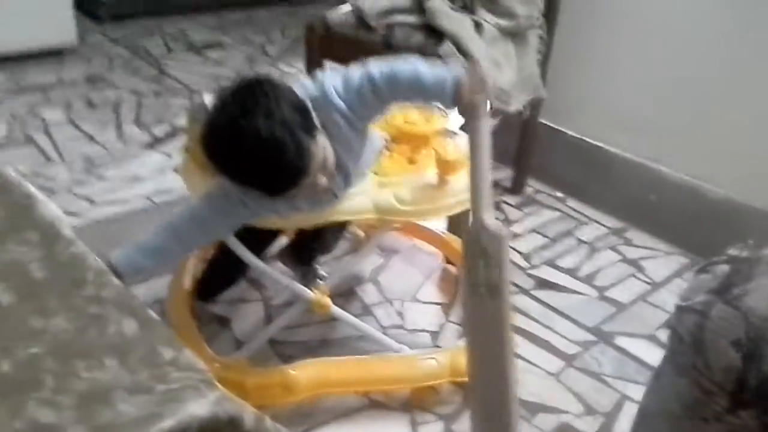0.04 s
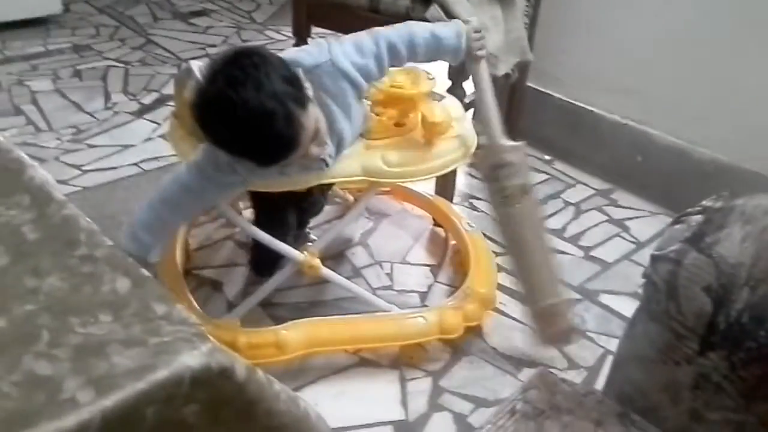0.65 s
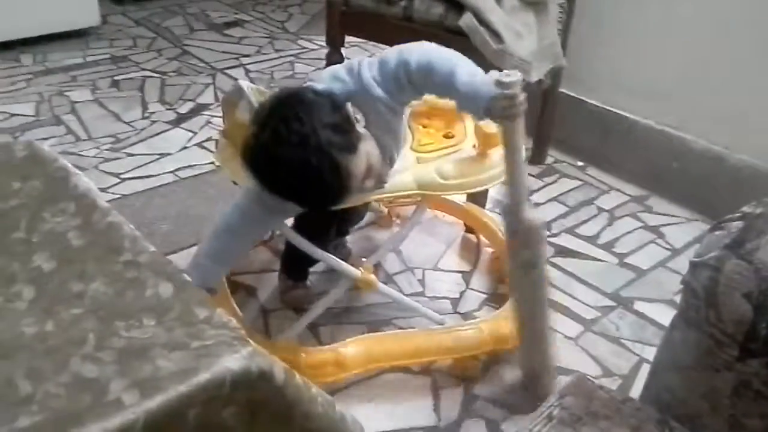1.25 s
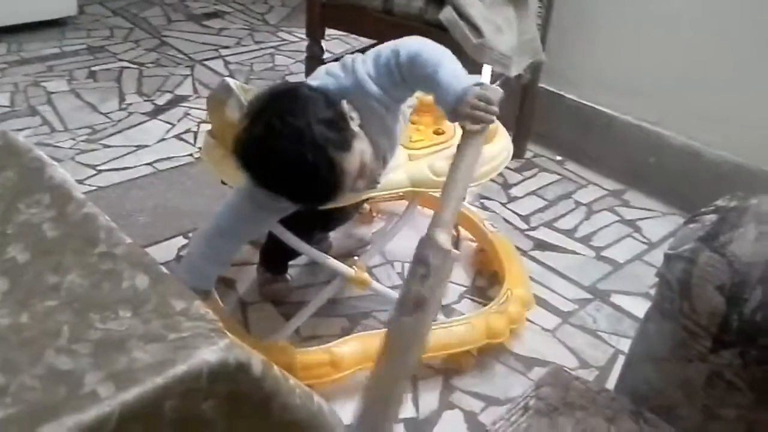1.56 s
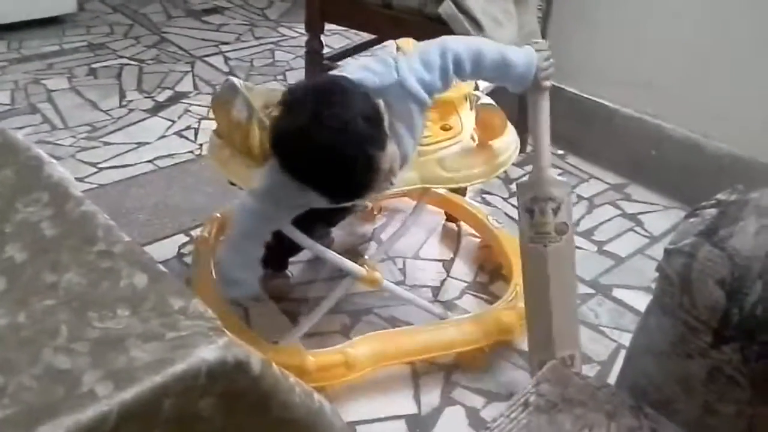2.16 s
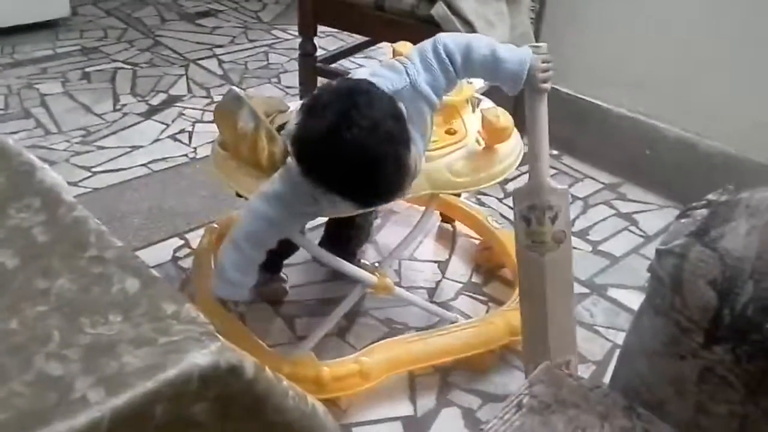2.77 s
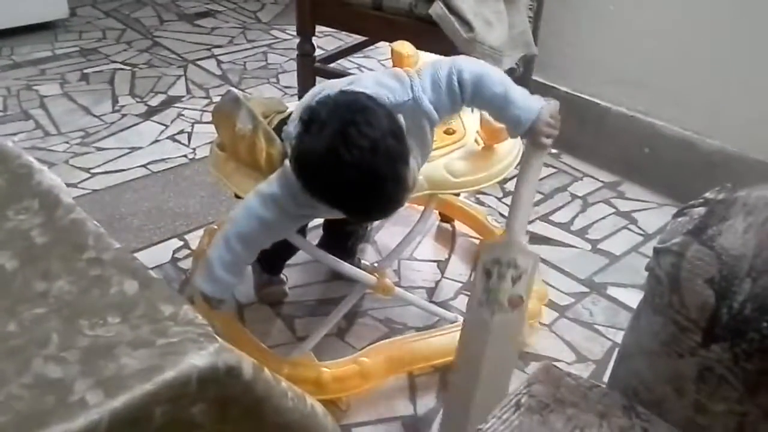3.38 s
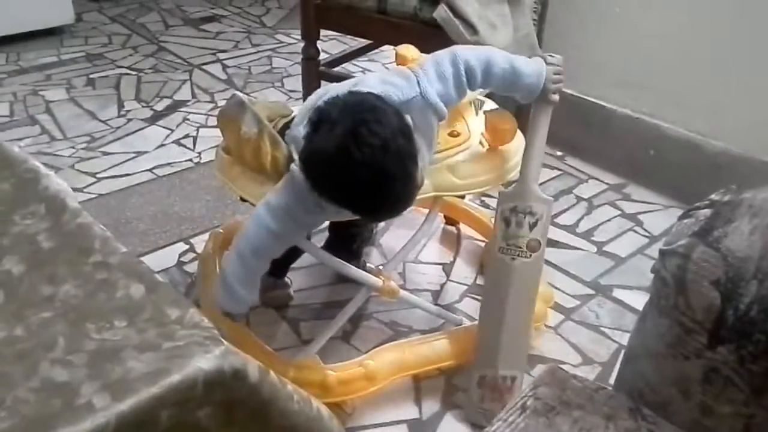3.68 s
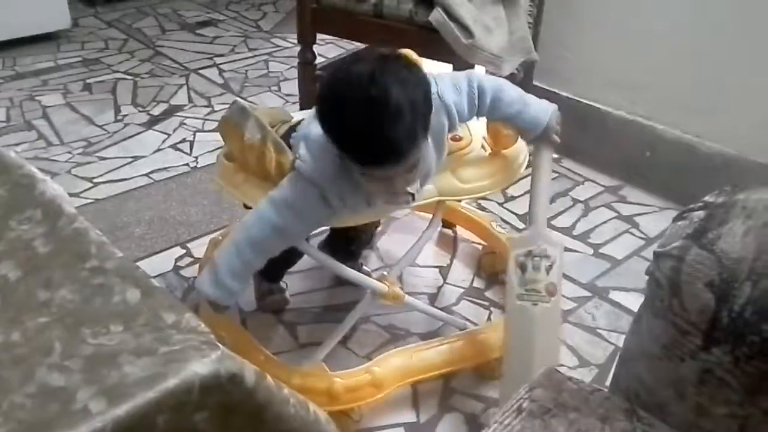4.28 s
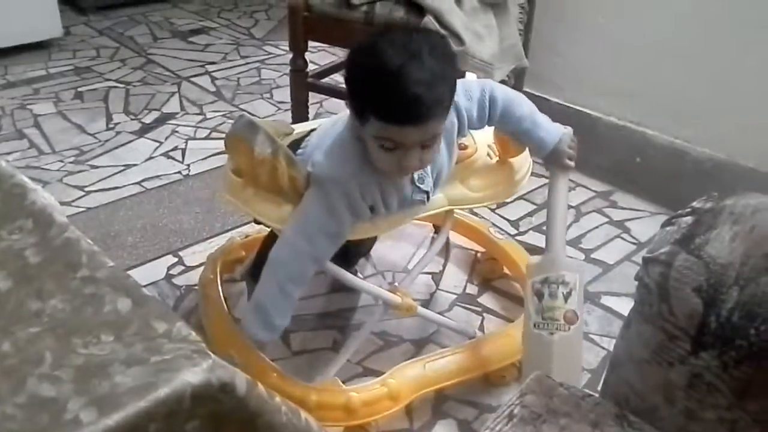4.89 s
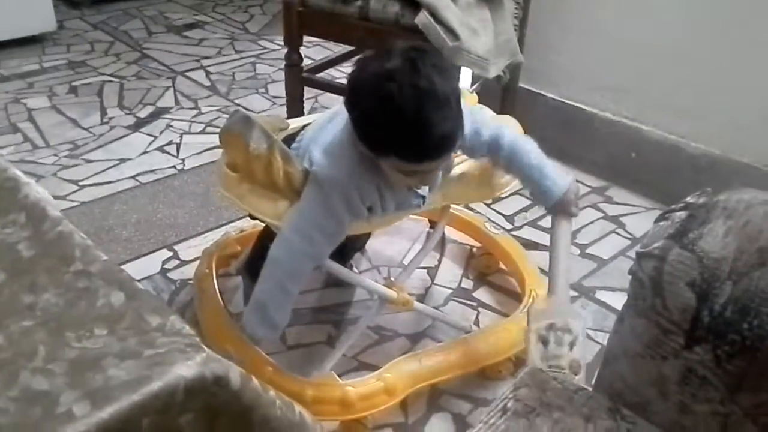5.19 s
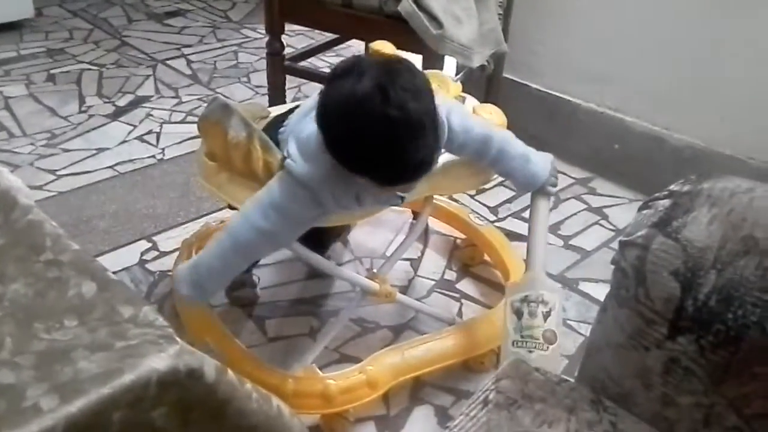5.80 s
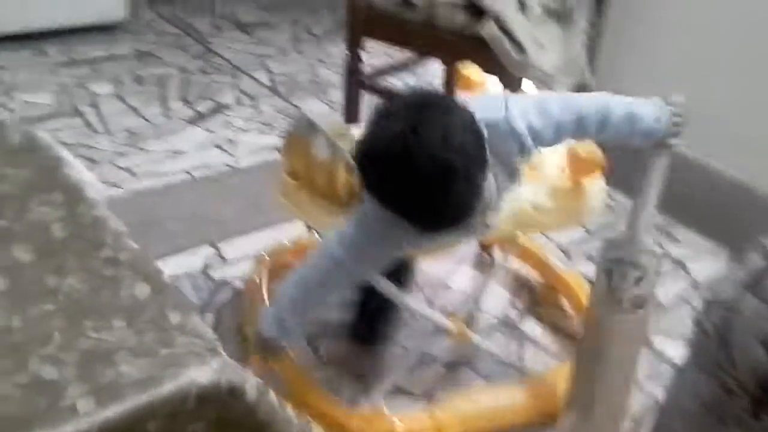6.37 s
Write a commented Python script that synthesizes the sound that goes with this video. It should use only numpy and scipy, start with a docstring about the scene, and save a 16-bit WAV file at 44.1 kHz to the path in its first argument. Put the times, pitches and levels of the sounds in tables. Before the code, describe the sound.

A hollow toy bat thuds and squeaks on a tiled floor and knocks against a rattling plastic baby walker in a bare room.

```python
"""A toy bat, banged about by a toddler in a plastic walker, in a bare, tiled room.
The hollow bat thuds and cracks on the floor, squeaks as its tip skids, and knocks on the walker's rim;
each knock makes loose plastic parts jump and clatter. In between, the joints tick and things slide
softly over the tiles. One small microphone in the room, far enough off to hear the walls answer."""
import sys
import numpy as np
from scipy import signal
from scipy.fft import rfft, irfft
from scipy.io import wavfile

SR = 44100
rng = np.random.default_rng(int(sys.argv[2]) if len(sys.argv) > 2 else 0)


def pcm_store(signal):
    """Save signal as 16-bit PCM."""
    levels = np.round(np.clip(np.atleast_2d(signal), -1, 1) * 32767)
    wavfile.write(sys.argv[1], SR, levels.astype(np.int16).T)


N = 292824
TIME = np.arange(N) / SR
RING_SIZE = 2 ** 15   # samples in one blow and its decay
AGE = np.arange(RING_SIZE) / SR
FREQS = np.maximum(np.fft.rfftfreq(RING_SIZE, 1 / SR), 1)

# The bat's tip landing on the floor. Each row: start in seconds, then relative level, bass shift
# and treble shift in dB.
TIP_BLOWS = [(0.191, -18, 1, 5.5), (0.816, -10, -5, 12.5), (1.9888, -6, 0, 8.5), (3.451, -19.5, 3, 9),
             (4.350, -31, -1, -8), (5.192, -22, 4, -4), (6.586, -9, -3.5, 3)]
# Cavity resonances of the hollow bat. Each row: centre in Hz, width in Hz, lift in dB.
BAT_CAVITY = [(112, 16, 5), (188, 24, 7), (242, 28, 7), (345, 25, 6), (428, 20, 6), (500, 20, 8),
              (664, 20, 7), (720, 25, 7), (1030, 40, 4), (1276, 35, 7), (2230, 100, 3)]


def from_db(db):
    """Decibels to gain."""
    return np.exp(np.asarray(db) * (np.log(10) / 20))


def rms_one(x):
    """Scale to unit rms."""
    return x / np.sqrt(np.mean(x ** 2) + 1e-20)


def at_hz(points, hz):
    """Read a table on a log-frequency axis."""
    knots, values = np.transpose(points)
    return np.interp(np.log(hz), np.log(knots), values)


def lifted(lifts, freqs):
    """Resonance peaks and dips on a response, in dB."""
    return sum(db / (1 + (2 * (freqs - hz) / width) ** 2) for hz, width, db in lifts)


def fade(t60):
    """Exponential decay that loses 60 dB in t60 seconds."""
    return from_db(np.maximum(-60 * AGE / max(t60, 1e-4), -200))


def swell(s, length_s, db, rise_db_per_s, fall_db_per_s):
    """Gain of one rubbing movement: it swells up to time s, holds for its length and dies away."""
    early, late = np.maximum(s - TIME, 0), np.maximum(TIME - s - length_s, 0)
    return from_db(np.maximum(db - rise_db_per_s * early - fall_db_per_s * late, -200))


def add(track, s, sound):
    """Mix a sound into a track at time s."""
    start = round(s * SR)
    track[start:start + len(sound)] += sound[:N - start]


def drift(rate_hz):
    """Smooth random wandering with a spread of about 1."""
    return np.interp(TIME * rate_hz, np.arange(N // 20), rng.standard_normal(N // 20))


def noise(colour, lifts=()):
    """Steady noise of a given spectrum and resonances, rms 1."""
    hz = np.maximum(np.fft.rfftfreq(N, 1 / SR), 1)
    gain = from_db(at_hz(colour, hz) + lifted(lifts, hz))
    return rms_one(irfft(rfft(rng.standard_normal(N)) * gain, N))


def through_body(x, response_db):
    """Causal (minimum-phase) filter with the given response."""
    cepstrum = irfft(np.log(from_db(response_db)))
    cepstrum[1:RING_SIZE // 2] *= 2
    cepstrum[RING_SIZE // 2 + 1:] = 0
    return irfft(rfft(x) * np.exp(rfft(cepstrum)))


def reflections(t60):
    """A cloud of reflections of unit energy."""
    return rms_one(rng.standard_normal(RING_SIZE) * fade(t60)) / np.sqrt(RING_SIZE)


def room_tail():
    """The tiled room's reverberation at unit energy, each band dying at its own pace."""
    # Decay of the room. Each row: frequency in Hz, t60 in seconds.
    decays = [(110, 0.82), (260, 0.45), (700, 0.54), (1900, 0.53), (5000, 0.45), (8000, 0.33),
              (14000, 0.51)]
    white = rfft(rng.standard_normal(RING_SIZE))
    knots = np.log(np.array(decays)[:, 0])
    bands = [irfft(white * np.interp(np.log(FREQS), knots, share)) for share in np.eye(len(decays))]
    tail = sum(band * fade(t60) for band, (hz, t60) in zip(bands, decays))
    return rms_one(tail) / np.sqrt(RING_SIZE)


def contact(tail, click_db, early_t60, early_db, room_db):
    """A click as it reaches the microphone: direct, off the floor and near wall, then the room's tail."""
    echoes = from_db(early_db) * reflections(early_t60) + from_db(room_db) * tail
    # the treble is beamed, so less of it comes back from the walls
    wall_gain = from_db(at_hz([(2500, 2.2), (7000, 0), (11000, 1.5)], FREQS))
    out = irfft(rfft(echoes) * wall_gain) + 1.12 * reflections(t60=0.041)
    out[0] += from_db(click_db)
    return out


def crowded_modes(spacing_hz, ripple_db):
    """The countless small modes of a body ripple its response above 1 kHz, in dB."""
    ripple = np.interp(FREQS / spacing_hz, np.arange(RING_SIZE), rng.standard_normal(RING_SIZE))
    return ripple_db * ripple * (FREQS > 1000)


def ringing(modes, longest_t60):
    """Decaying sines, struck a little differently each time; none outlasts longest_t60."""
    out = np.zeros(RING_SIZE)
    for hz, db, t60 in modes:
        phase = 2 * np.pi * (hz * AGE + rng.random())
        out += from_db(db + rng.normal(0, 1.3)) * np.sin(phase) * fade(min(t60, longest_t60))
    return out * (1 - fade(0.025))


def blows(rows, colour, modes=(), lifts=(), level_db=0, ring_db=0, longest_t60=0.5, **acoustics):
    """Blows on one body: where and how hard each lands shifts its bass and treble."""
    out, common_tail = np.zeros(N), room_tail()
    shared = 0.75   # blows land near one another, so they share most of their room response
    body_db = at_hz(colour, FREQS) + lifted(lifts, FREQS)
    body_db -= np.mean(body_db[(FREQS > 900) & (FREQS < 3000)])
    body_db += crowded_modes(spacing_hz=60, ripple_db=2.2)
    for s, db, bass_db, treble_db in rows:
        touch_db = at_hz([(290, bass_db), (900, 0), (2400, 0), (4200, treble_db)], FREQS)
        tail = np.sqrt(shared) * common_tail + np.sqrt(1 - shared) * room_tail()
        impact = through_body(contact(tail, **acoustics), body_db)
        ring = from_db(ring_db) * ringing(modes, longest_t60)
        add(out, s, from_db(db + level_db) * through_body(impact + ring, touch_db))
    return out


def room_tone(level_db=-67):
    """The quiet air of the room, strongest in the bass."""
    # Spectrum of the air. Each row: frequency in Hz, relative level in dB.
    colour = [(18, -36.5), (30, -8.5), (124, -4), (684, -22), (1040, -20), (6550, -23.5), (9970, -24),
              (13300, -24), (16000, -36.5)]
    return from_db(level_db) * noise(colour)


def joint_ticks(level_db=7):
    """The walker's joints give small dry ticks as the frame shifts."""
    # The ticks. Each row: start in seconds, relative level in dB.
    ticks = [(0.123, -54), (0.4973, -43), (0.71, -18.5), (1.275, -30.5), (1.578, -37.5), (1.818, -32.5),
             (4.4817, -43.5), (5.292, -40), (6.253, -31), (6.3074, -33)]
    # Spectrum of a tick. Each row: frequency in Hz, relative level in dB.
    colour = [(200, -19), (1500, -2), (4000, 1), (5700, 12.5), (7000, 9), (9000, -20), (16000, -26)]
    out, tail = np.zeros(N), room_tail()
    for s, db in ticks:
        click = contact(tail, click_db=4.5, early_t60=0.022, early_db=-12.5, room_db=-4.5)
        add(out, s, from_db(db + level_db) * through_body(click, at_hz(colour, FREQS)))
    return out


def sliding(level_db=-1):
    """Rubbing over the tiles: the hollow bat rumbles under a hiss that catches on the grit."""
    # Shoves and drags. Each row: start and length of the hold in seconds, relative rumble and hiss in dB.
    shoves = [(0.279, 0.04, -65, -54), (0.567, 0.03, -58, -48.5), (1.057, 0.084, -41, -49),
              (1.286, 0.086, -41.5, -44.5), (1.69, 0.091, -54.5, -47.5), (2.206, 0.079, -51.5, -53.5),
              (2.743, 0.024, -76, -45.5), (4.156, 0.059, -48.5, -49), (4.412, 0.038, -54, -57),
              (4.553, 0.54, -65, -66.5), (5.163, 0.13, -47.5, -49), (5.795, 0.12, -54, -39.5),
              (6.275, 0.05, -39, -42.5), (6.441, 0.016, -44.5, -35.5)]
    # Spectra of the rumble and the hiss. Each row: frequency in Hz, relative level in dB.
    rumble_colour = [(41, -48.5), (70, -5.5), (200, -13.5), (350, -9.5), (450, -2.5), (580, -10), (670, -8),
                     (800, -9), (1050, -7.5), (1550, -12), (2230, -9.5), (3000, -19.5), (3900, -21),
                     (6600, -58)]
    hiss_colour = [(1000, -41), (1700, -5.5), (2210, -14.5), (2770, -12.5), (4470, -3), (4950, -7.5),
                   (6320, 2), (10200, -17), (11700, -24.5), (14300, -13.5), (15300, -25.5), (16000, -42.5)]
    slopes = dict(rise_db_per_s=159, fall_db_per_s=135)   # every shove gathers speed and runs out alike
    rumble, hiss = np.zeros((2, N))
    for s, length_s, rumble_db, hiss_db in shoves:
        rumble += swell(s, length_s, rumble_db + level_db, **slopes)
        hiss += swell(s, length_s, hiss_db + level_db, **slopes)
    grit = from_db(2.8 * drift(450))
    return rumble * noise(rumble_colour, BAT_CAVITY) + hiss * grit * noise(hiss_colour)


def rasp(level_db=-2, judder_db=2):
    """The bat's tip loses its grip on the tile and rubs with a juddering rasp."""
    # The rubs. Each row: start and length of the hold in seconds, relative level in dB.
    rubs = [(1.133, 0.33, -49.5), (1.675, 0.049, -46.5)]
    # Spectrum of the rasp. Each row: frequency in Hz, relative level in dB.
    colour = [(1700, -49), (2050, -4), (2230, -3.5), (2400, -7.5), (2800, -30)]
    rubbing = sum(swell(*rub, rise_db_per_s=219, fall_db_per_s=132) for rub in rubs)
    return rubbing * from_db(level_db + judder_db * drift(120)) * noise(colour)


def squeak(slips, hz, level_db, octave_db, flutter_db, room_db):
    """Stick-slip on the glaze: a rising, wavering tone with a weak octave, smeared by the room."""
    start_s, glide_s, flat_share = 0.77, 0.06, 0.12   # it starts flat and glides up to pitch
    pitch = hz * (1 - flat_share * np.exp(-np.maximum(TIME - start_s, 0) / glide_s))
    phase = 2 * np.pi * np.cumsum(pitch * (1 + 0.023 * drift(700))) / SR
    wave = np.sin(phase) + from_db(octave_db) * np.sin(2 * phase)
    grip = sum(swell(*slip, rise_db_per_s=528.5, fall_db_per_s=380) for slip in slips)
    tone = grip * from_db(level_db + flutter_db * drift(140)) * wave
    return tone + from_db(room_db) * signal.fftconvolve(tone, room_tail())[:N]


def skid():
    """The bat's tip catches and slips, squeaking in two tones, more weakly each time."""
    # The slips. Each row: start and length of the hold in seconds, relative low and high tone in dB.
    slips = [(0.826, 0.041, -18, -30), (0.943, 0.022, -28, -35), (1.013, 0.012, -40, -44),
             (1.067, 0.07, -55, -64)]
    s, length_s, low_db, high_db = np.transpose(slips)
    low_slips, high_slips = zip(s, length_s, low_db), zip(s, length_s, high_db)
    low = squeak(low_slips, hz=1992, level_db=-1, octave_db=-25, flutter_db=4, room_db=-8)
    high = squeak(high_slips, hz=2280, level_db=3, octave_db=-20, flutter_db=6.5, room_db=-11)
    return low + high


def clatter():
    """The walker's loose plastic parts fall back just after each knock."""
    # The landings. Each row: start in seconds, relative level in dB, hardness in dB.
    landings = [(2.4223, -6, 2.5), (2.454, -7, 3), (2.4846, -17, 0), (2.6353, -6.5, 0.5), (2.6611, -12, -2),
                (2.8387, -6.5, 0), (2.852, -6, 1.5), (2.88, -6, -3), (3.0463, -7.5, -9),
                (3.0711, -11, -3.5), (3.242, -4, 0.5), (3.4408, -4.5, -5), (3.6125, -7, -4),
                (3.6211, -10.5, -12), (5.3804, -6.5, -6), (5.3915, -5.5, -1), (5.3953, -2, 2.5),
                (5.4256, -7.5, 5), (5.4518, -10.5, 2), (5.7249, -12.5, -6.5), (5.9581, -6, 4),
                (5.9668, -11, -1), (5.9966, -4, -1.5), (6.0332, -3.5, 2)]
    # Spectrum of a landing. Each row: frequency in Hz, relative level in dB.
    colour = [(47, -42.5), (80, -33.5), (451, -4.5), (563, -27.5), (1050, -9), (1200, -35.5), (1700, -5),
              (2900, -20.5), (5050, -17.5), (6450, 1.5), (8790, -27), (14300, -61), (16000, -59)]
    # Thin ringing of the parts. Each row: pitch in Hz, relative level in dB, uncapped t60 in seconds.
    modes = [(1426, -5, .35), (1514, -4, .4), (1711, 1, .33), (2245, -7, .36), (2560, -14, .35),
             (3483, -16, .4), (4345, -13, .4), (4581, -15, .4), (5342, -7, .25), (5797, -8, .3),
             (6244, -8, .25), (6348, -7, .3), (6490, -6, .22)]
    # Resonances and dips of the hollow plastic. Each row: centre in Hz, width in Hz, lift in dB.
    shell = [(1412, 107, 18.5), (1764, 77, 7), (2280, 74, 7), (2540, 47, 10.5), (3150, 130, 9.5),
             (3633, 200, 12.5), (4480, 400, 12.5), (5340, 17, -9), (5600, 17, -21), (7050, 170, -1.5)]
    boom_loss = 0.44   # a harder landing is brighter and booms less: dB of bass lost per dB of hardness
    rows = [(s, db, -boom_loss * hard_db, hard_db) for s, db, hard_db in landings]
    return blows(rows, colour, modes, shell, level_db=4.5, ring_db=-26.5, longest_t60=0.23,
                 click_db=4, early_t60=0.088, early_db=4.5, room_db=3)


def rim_knocks():
    """The bat strikes the walker's rim and the frame booms."""
    # The knocks. Each row: start in seconds, then relative level, bass shift and treble shift in dB.
    knocks = [(2.3807, -7, 0.5, 1.5), (2.6107, -13, 3, 2), (2.814, -10, -1, 2), (3.0205, -12.5, 3, 1.5),
              (3.2124, -9.5, 2.5, 0.5), (3.4169, -11.5, -2.5, 3), (3.5897, -10.5, 2, 0),
              (5.3519, -8, 0, 2.5), (5.6528, -8, 1.5, -1), (5.9555, -5.5, 5, -4.5)]
    # Spectrum of a knock. Each row: frequency in Hz, relative level in dB.
    colour = [(29, -16), (50, -21), (218, -0.5), (418, -2.5), (1180, -10), (1360, -5.5), (1580, -9.5),
              (1740, -2.5), (3330, -15), (4560, -6), (5270, -12.5), (6240, -1.5), (9180, -21.5),
              (13800, -34), (16000, -33)]
    # Ringing of the frame. Each row: pitch in Hz, relative level in dB, uncapped t60 in seconds.
    modes = [(169.3, -6, 0.4), (361.4, -5, 0.47), (762, -11, 0.89), (1030, -13, 0.62), (1120, -20.5, 0.43),
             (1322, -5, 0.25), (1430, -4.5, 0.42), (1490, -11.5, 0.85), (1610, -39, 0.7), (1773, -10, 0.89),
             (1690, -17, 1.1), (1960, -9.5, 1.3)]
    # Resonances and dips of the frame. Each row: centre in Hz, width in Hz, lift in dB.
    frame = [(99, 29, 1.5), (270, 18, 8), (357, 20, 3.5), (431, 21, 2.5), (1028, 50, -7), (1412, 70, -3)]
    return blows(knocks, colour, modes, frame, level_db=7, ring_db=-25.5, longest_t60=0.54,
                 click_db=2.5, early_t60=0.063, early_db=6, room_db=12.5)


def tip_snaps(level_db=-9):
    """The bat's tip meets the tile with a thin snap before its body answers."""
    # Spectrum of hard plastic meeting glaze. Each row: frequency in Hz, relative level in dB.
    colour = [(2000, -29), (5000, -7.5), (6800, 4.5), (9000, -5), (11000, -11.5), (15000, -6), (17000, -22)]
    out, tail = np.zeros(N), room_tail()
    for s, db, _, _ in TIP_BLOWS:
        click = contact(tail, click_db=1.5, early_t60=0.02, early_db=-8.5, room_db=3.5)
        add(out, s, from_db(db + level_db) * through_body(click, at_hz(colour, FREQS)))
    return out


def edge_slaps():
    """The bat's edge hits the tiles with a hard, bright crack."""
    # The slaps. Each row: start in seconds, then relative level, bass shift and treble shift in dB.
    slaps = [(0.5824, -7.5, -1.5, -3.5), (6.4685, -9.5, 0, 0)]
    # Spectrum of a slap. Each row: frequency in Hz, relative level in dB.
    colour = [(29, -53), (50, -36), (114, -4), (152, -11.5), (321, -4.5), (418, -10), (461, -6.5),
              (822, -9.5), (997, -7), (1960, -1.5), (2680, -8.5), (6390, -1.5), (12000, -31),
              (14500, -28.5), (16000, -60)]
    return blows(slaps, colour, level_db=15, click_db=-14.5, early_t60=0.35, early_db=9.5, room_db=10)


def tip_thuds():
    """The bat lands tip first and its hollow body answers with a dull thud."""
    # Spectrum of a thud. Each row: frequency in Hz, relative level in dB.
    colour = [(29, -30), (60, -24.5), (150, -16.5), (250, -5.5), (461, -2), (586, -10.5), (711, -4.5),
              (1020, -12.5), (1270, -12.5), (1500, -17.5), (2210, -14), (2620, -26.5), (3250, -33.5),
              (6240, -29.5), (11100, -56.5), (14200, -62.5), (16000, -92)]
    # Ringing after a thud. Each row: pitch in Hz, relative level in dB, uncapped t60 in seconds.
    modes = [(112, -16, 1.7), (186.8, -23, 0.9), (372, -2.5, 0.091), (430, -28.5, 0.14), (505, -9, 0.49),
             (658, -8.5, 0.31), (730, -13.5, 1.4), (1275, -14, 0.23), (1480, -46.5, 0.78),
             (1666, -30.5, 0.94), (1970, -43, 1.6), (2262, -7.5, 0.083), (2380, -41.5, 0.12),
             (2990, -29.5, 0.26)]
    return blows(TIP_BLOWS, colour, modes, BAT_CAVITY, level_db=5, ring_db=-15, longest_t60=0.79,
                 click_db=-0.5, early_t60=0.13, early_db=8.5, room_db=14.5)


def scene():
    """Bat, walker and rubbing over the room tone, in mono from one spot in the room."""
    bat = tip_thuds() + edge_slaps() + tip_snaps()
    walker = rim_knocks() + clatter() + joint_ticks()
    rubbing = sliding() + rasp() + skid()
    return (bat + walker + rubbing + room_tone())[None]


def record(dry):
    """The small microphone loses the deepest bass, the highest peaks are rounded and the top is cut."""
    low_cut_hz, high_cut_hz, ceiling = 41, 15250, 1.5
    low_cut = signal.butter(2, low_cut_hz, "high", fs=SR, output="sos")
    high_cut = signal.ellip(10, 0.1, 80, high_cut_hz, fs=SR, output="sos")
    thin = signal.sosfilt(low_cut, dry)
    rounded = ceiling * np.tanh(thin / ceiling)
    return signal.sosfilt(high_cut, rounded)


dry = scene()
out = record(dry)
pcm_store(out)
```